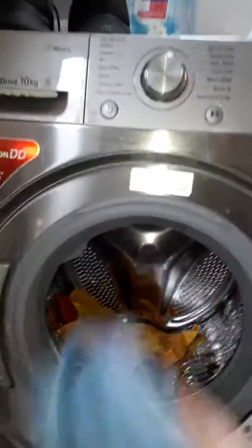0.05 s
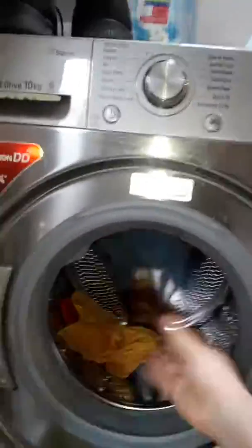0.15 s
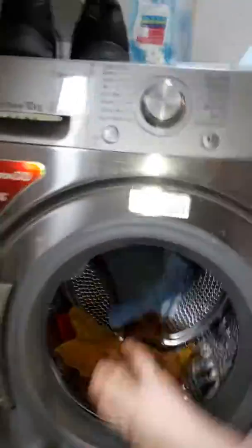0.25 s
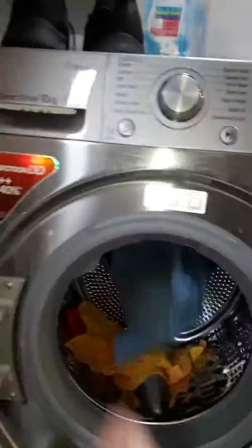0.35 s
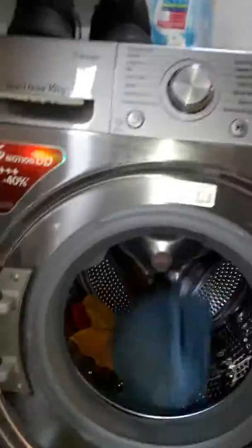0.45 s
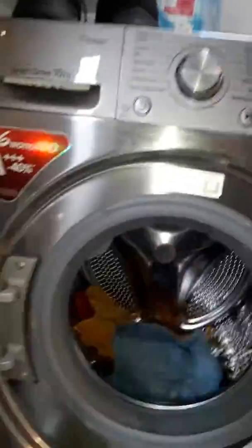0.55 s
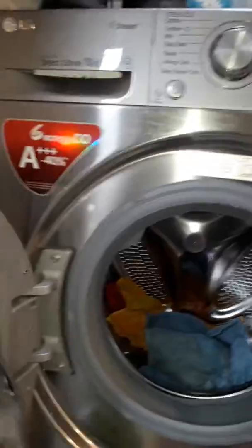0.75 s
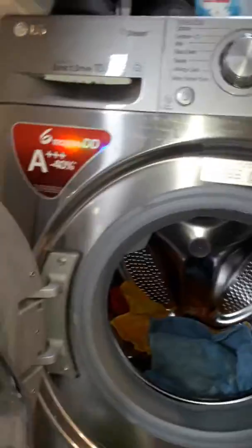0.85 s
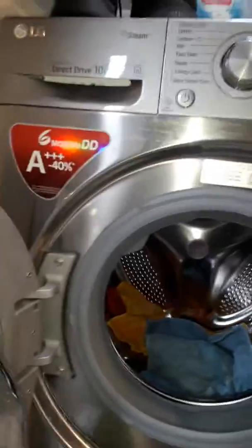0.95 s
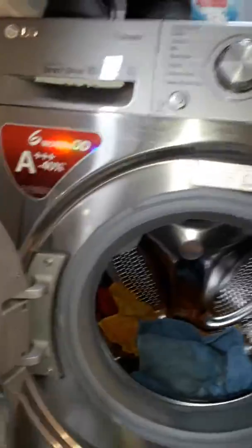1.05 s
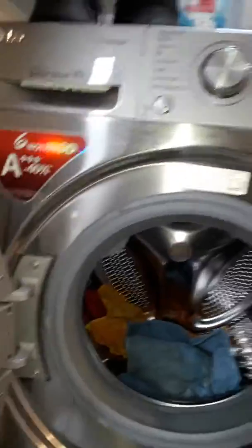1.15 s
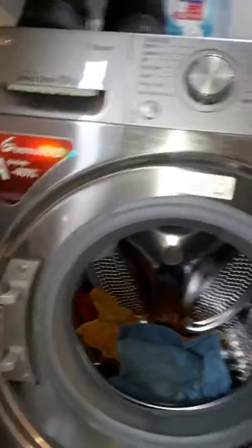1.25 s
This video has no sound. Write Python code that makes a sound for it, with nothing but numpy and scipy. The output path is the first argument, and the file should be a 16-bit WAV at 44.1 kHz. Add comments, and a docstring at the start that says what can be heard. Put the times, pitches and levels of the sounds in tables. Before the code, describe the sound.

One sharp metal clank as clothing is tossed into a washing machine, over faint hum.

```python
"""A small room, one microphone close to the steel drum of a washing machine.
A garment is thrown in: it grazes the rim, a hard part of it clanks on the drum,
which thumps and rings, and the cloth settles with small ticks.
Mains hum, room noise and soft rustling go on underneath."""
import sys
import numpy as np
from scipy import signal
from scipy.fft import rfft, irfft
from scipy.io import wavfile

SR = 44100
rng = np.random.default_rng(int(sys.argv[2]) if len(sys.argv) > 2 else 0)


def unload_audio(sound):
    """Save the sound as a 16-bit wav file, at the path given as the first command line argument."""
    columns = np.transpose(np.atleast_2d(sound))
    # keep every value between -1 and 1, then stretch to whole-number steps
    steps = np.round(np.clip(columns, -1, 1) * 32767)
    wavfile.write(sys.argv[1], SR, steps.astype(np.int16))


N = 57330
T = np.arange(N) / SR
FREQS = np.fft.rfftfreq(N, 1 / SR)


def amp(db):
    """Decibels to gain."""
    return 10 ** (np.asarray(db) / 20)


def noise(colour):
    """Noise of rms 1 whose spectrum has the shape colour(Hz), in dB."""
    shaped = irfft(rfft(rng.standard_normal(N)) * amp(colour(FREQS)), N)
    return shaped / np.sqrt(np.mean(shaped ** 2) + 1e-20)


def coloured(points):
    """Noise of rms 1 shaped by rows of f/Hz, level/dB, joined on a log-frequency axis."""
    hz, db = np.array(points).T[:2]
    return noise(lambda f: np.interp(np.log(f + 1), np.log(hz), db))


def band(hz, octaves):
    """Noise in one steep-sided band."""
    return noise(lambda f: -20 * np.log10(1 + (np.log2((f + 1) / hz) / octaves) ** 4))


def wander(hz):
    """Slow random motion of rms 1, mostly below hz."""
    return noise(lambda f: -40 * np.log10(1 + (f / hz) ** 2))


def since(start):
    """Seconds since start, zero before."""
    return np.maximum(T - start, 0)


def swell(centre, length):
    """A smooth rise and fall."""
    return np.exp(-(2 * (T - centre) / length) ** 2)


def room_tone():
    """Mains hum, each line wavering in level and phase, over steady room noise."""
    # room noise spectrum: f/Hz, relative level/dB
    colour = [(25, -28), (50, 1), (100, 0.5), (170, -1.5), (260, 3), (450, -6), (750, -11), (1250, -13.5),
              (1850, -14.5), (2300, -28), (4000, -26), (5500, -38.5), (7800, -30), (9000, -46),
              (15500, -41)]
    # hum lines: f/Hz, level/dB
    hum_lines = [(100.2, -39.5), (150.5, -50), (249, -46.5), (300, -53), (349, -57.5), (399, -50.5),
                 (425, -52), (463, -51), (549, -50.5), (600, -53.5), (700, -55.5), (801, -57), (950, -57),
                 (1249, -59.5)]
    waver_depth, waver_hz = .24, 3.5
    bed = amp(-39.5) * coloured(colour)
    for hz, db in hum_lines:
        size = 1 + waver_depth * wander(waver_hz)
        drift = waver_depth * wander(waver_hz)
        phase = 2 * np.pi * (hz * T + rng.random()) + drift
        bed += np.sqrt(2) * amp(db) * size * np.sin(phase)
    return bed


def rustle():
    """The fabric rustles in faint, bright swells."""
    # swells: peak t/s, length/s, level/dB
    swells = [(0.038, .06, -53.5), (0.138, 0.11, -53), (0.297, 0.21, -53), (0.525, 0.19, -56.5),
              (0.714, 0.13, -54.5), (1.05, .19, -58), (1.278, 0.13, -61.5)]
    # fabric spectrum: f/Hz, relative level/dB
    colour = [(500, -25), (2000, -1.5), (4000, -5), (7800, -2.5), (9000, -19), (12000, -9), (15500, -30)]
    return coloured(colour) * sum(amp(db) * swell(at, length) for at, length, db in swells)


def flops():
    """The cloth bundle lands in soft pushes, each a dull puff of noise."""
    # pushes: peak t/s, length/s, level/dB, centre f/Hz, width/octaves
    pushes = [(0.141, 0.047, -39.5, 275, 0.49), (0.177, 0.086, -33, 460, 0.8),
              (0.391, 0.054, -44, 1060, 0.93), (0.54, 0.051, -34.5, 290, 0.95),
              (0.618, 0.057, -41, 790, 0.37)]
    return sum(amp(db) * swell(at, length) * band(hz, octaves) for at, length, db, hz, octaves in pushes)


def ticks():
    """Cloth and fastenings touch lightly; each touch starts at once and dies away."""
    # touches: t/s, level/dB, centre f/Hz, width/octaves, t60/s
    touches = [(.156, -43.5, 4540, 0.19, 0.027), (0.156, -28.5, 880, 1, 0.052),
               (.158, -33, 1900, 0.14, 0.09), (0.549, -47, 3200, 0.26, 0.36),
               (0.551, -44.5, 1430, 0.9, 0.45), (1.028, -46.5, 1260, 0.062, 0.14)]
    return sum((T > at) * amp(db - 60 * since(at) / t60) * band(hz, octaves)
               for at, db, hz, octaves, t60 in touches)


def crack(t, db=-23, t60=.038):
    """A bright snap as the hard part meets the steel."""
    # snap spectrum: f/Hz, relative level/dB
    colour = [(200, -6), (500, 2), (1000, -26), (3000, -8), (7500, 6), (9000, -8), (12000, -3),
              (15500, -21)]
    return (t > 0) * amp(db - 60 * t / t60) * coloured(colour)


def thump(t, hz=102.3, db=-12, length_s=.053):
    """The sprung tub takes the weight of the cloth in one short heave of a few low cycles."""
    heave = np.sin(np.pi * np.minimum(t / length_s, 1))
    return amp(db) * heave * np.sin(2 * np.pi * hz * t)


def ring(t, rise_s=.001, hold_s=.04):
    """The drum's modes hold while the garment is still landing, then die each at its own speed."""
    # drum modes: f/Hz, relative level/dB, t60/s
    modes = [(114, -22, .75), (141, -24, 1.65), (248.5, -27, .6), (395.3, -16.5, .68), (425, -27, .85),
             (467.5, -13.5, .58), (537, -27, .35), (560, -20, .1), (598, -22, .13), (635.5, -25, .26),
             (813, -21, .16), (857, -18.5, .2), (1615, -35, .36), (1751, -22, .13), (2616, -36.5, .45),
             (2885, -37, .34), (3212, -26, .16), (3289, -27, .25), (3744, -29, .21), (4060, -31, .2)]
    attack = 1 - np.exp(-t / rise_s)
    free = np.maximum(t - hold_s, 0)
    return attack * sum(amp(db - 60 * free / t60) * np.sin(2 * np.pi * hz * t) for hz, db, t60 in modes)


def clatter(t, db=-12, rise_s=.0012, hold_s=.011, tail_db=-12.5, tail_t60=.3):
    """The thin, perforated steel clatters; each band of its dense modes dies into the room's tail."""
    # bands of sheet modes: f/Hz, relative level/dB, t60/s
    bands = [(60, -10, 0.56), (292, -13, 1), (543, 4, 0.061), (740, -12.5, 0.29), (790, 5, 0.14),
             (1000, -9.5, 0.42), (1610, -12, 0.34), (1840, 4, 0.17), (2020, -14, 0.29), (3240, -9, 0.33),
             (4360, -9, 0.18), (5360, -16, 0.14), (7960, -16, 0.098), (8820, -35, .12),
             (11700, -22.5, 0.057), (15500, -42, 0.11)]
    spectrum = rfft(coloured(bands))
    centres, _, t60s = np.array(bands).T
    free = np.maximum(t - hold_s, 0)
    tail = amp(tail_db - 60 * t / tail_t60)  # the small room prolongs the clatter
    sheet = np.zeros(N)
    for pick, t60 in zip(np.eye(len(bands)), t60s):
        share = np.interp(np.log(FREQS + 1), np.log(centres), pick)  # fades into the next bands
        decay = np.hypot(amp(-60 * free / t60), tail)
        sheet += irfft(spectrum * share, N) * decay
    return amp(db) * np.minimum(t / rise_s, 1) * sheet


def clank():
    """The garment's hard part strikes the drum: crack, thump, ring and clatter start together."""
    # blow on the drum: t/s, gain/dB
    blows = [(0.199, -0.5)]
    drum = np.zeros(N)
    for at, db in blows:
        t = since(at)
        drum += amp(db) * (crack(t) + thump(t) + ring(t) + clatter(t))
    return drum


def scene():
    """Room, garment and drum at one close microphone."""
    return (room_tone() + rustle() + flops() + ticks() + clank())[None]


def record(dry, low_cut_hz=82, high_cut_hz=15800):
    """The microphone sheds the deep bass, rounds off the loudest peaks and loses the top treble."""
    low_cut = signal.butter(2, low_cut_hz, "high", fs=SR, output="sos")
    high_cut = signal.firwin(511, high_cut_hz, window=("kaiser", 9), fs=SR)
    thin = signal.sosfilt(low_cut, dry)
    limited = thin / (1 + thin ** 8) ** (1 / 8)
    return signal.oaconvolve(limited, high_cut[None], "same")


dry = scene()
out = record(dry)
unload_audio(out)
```